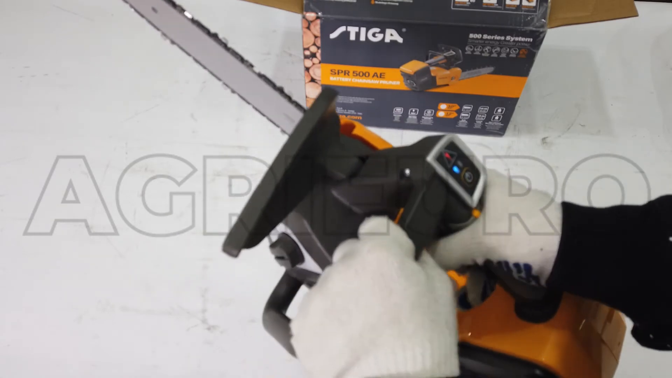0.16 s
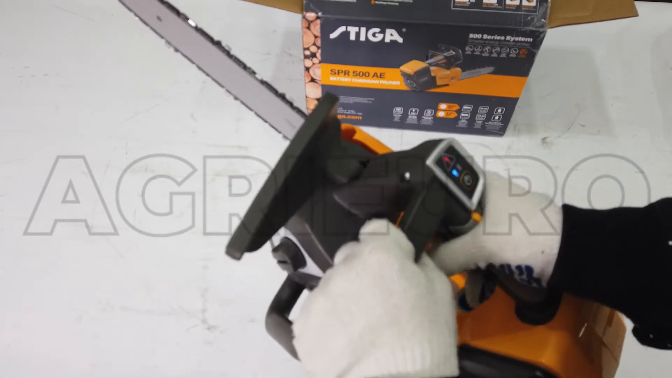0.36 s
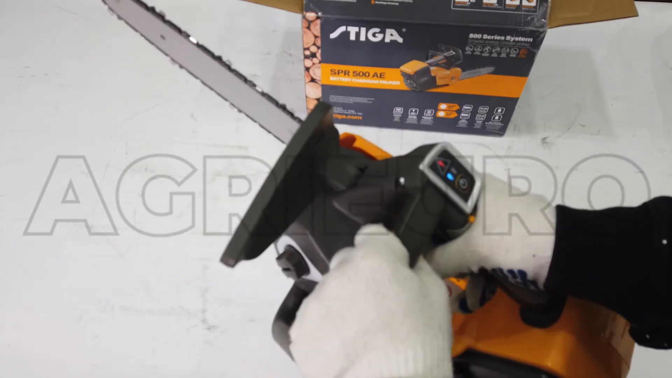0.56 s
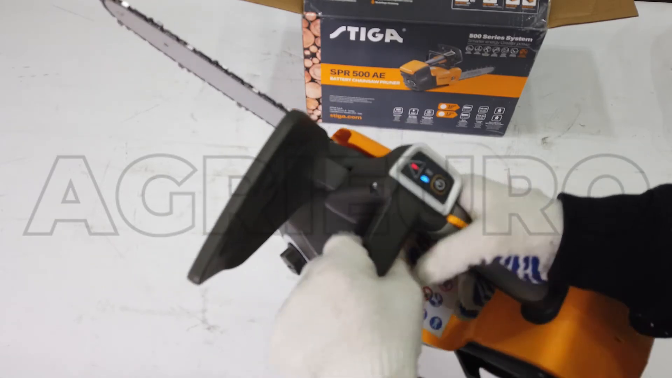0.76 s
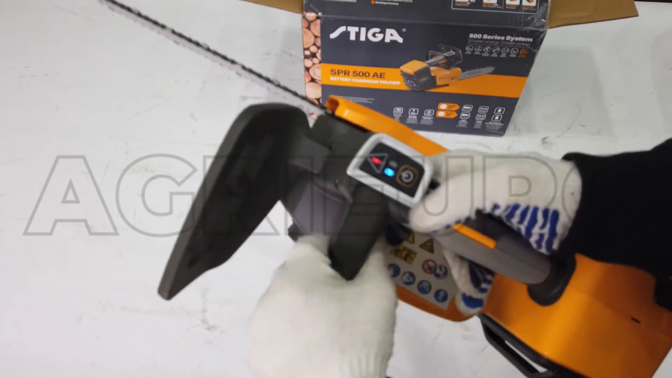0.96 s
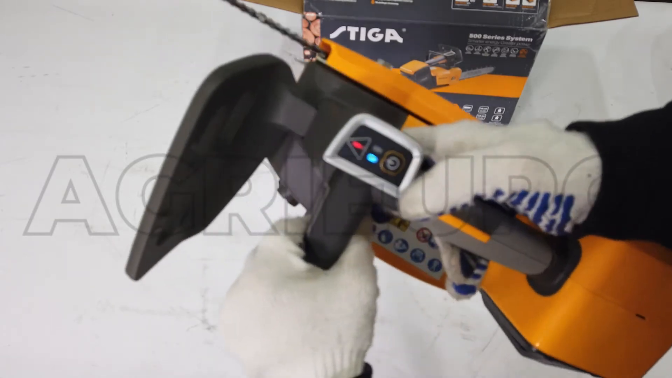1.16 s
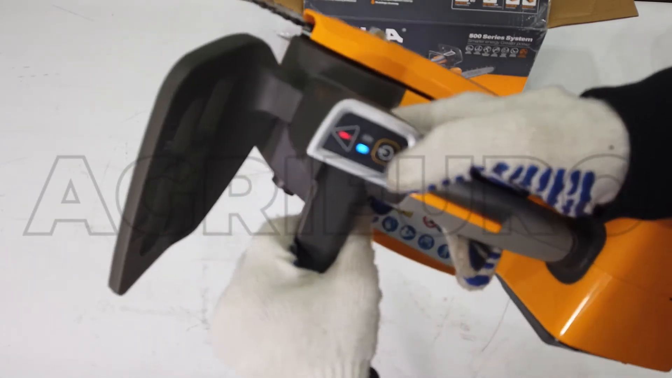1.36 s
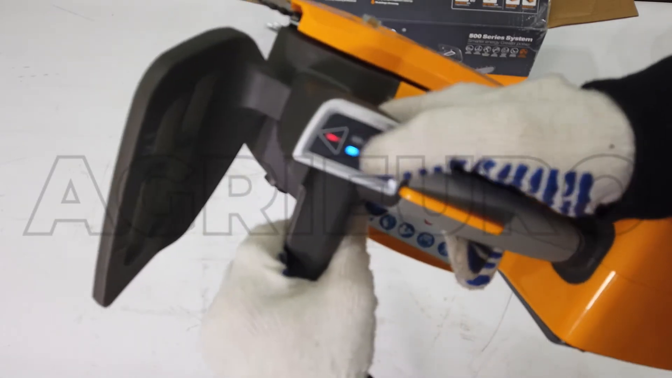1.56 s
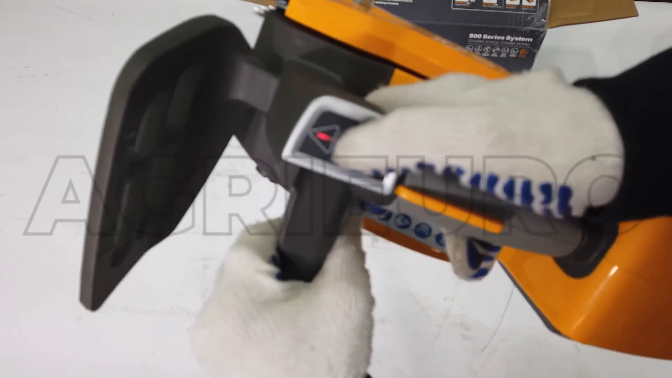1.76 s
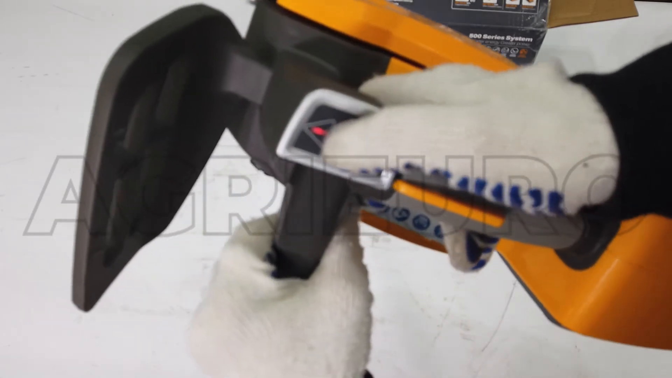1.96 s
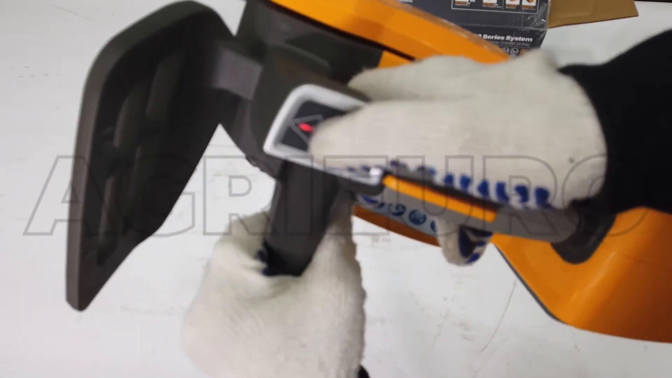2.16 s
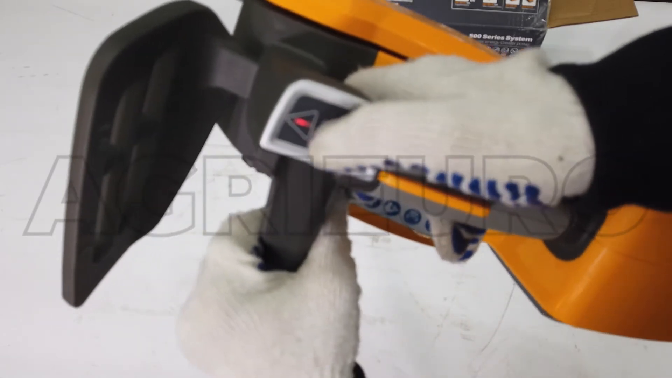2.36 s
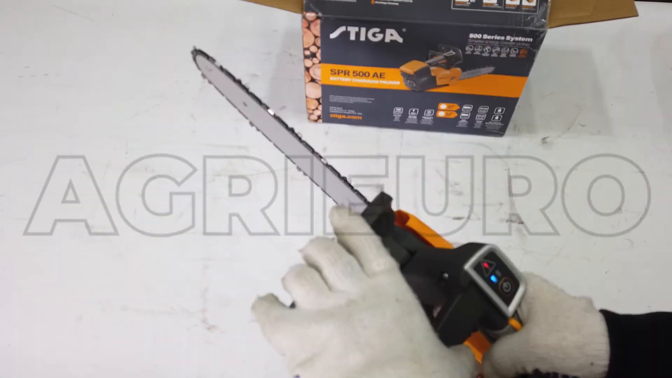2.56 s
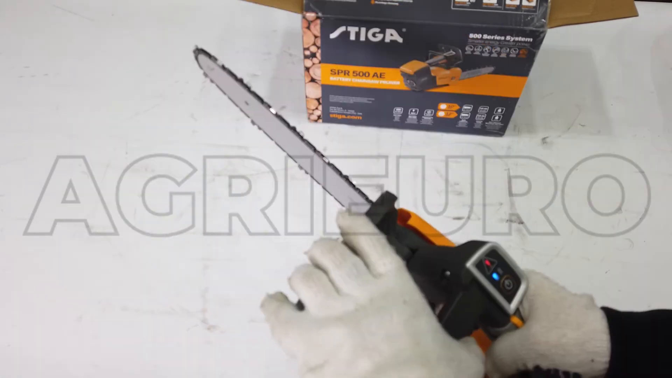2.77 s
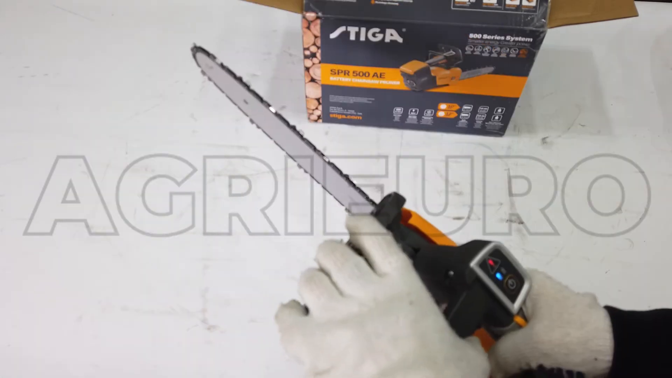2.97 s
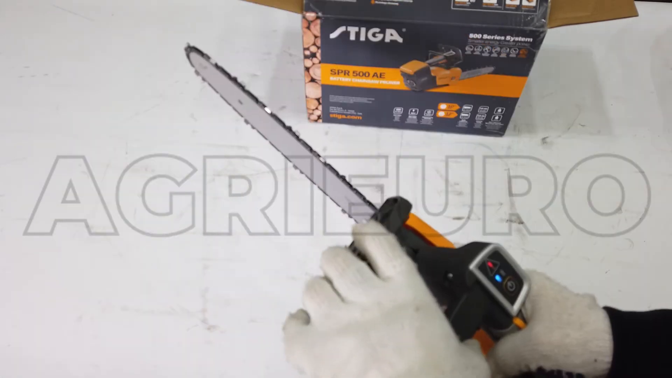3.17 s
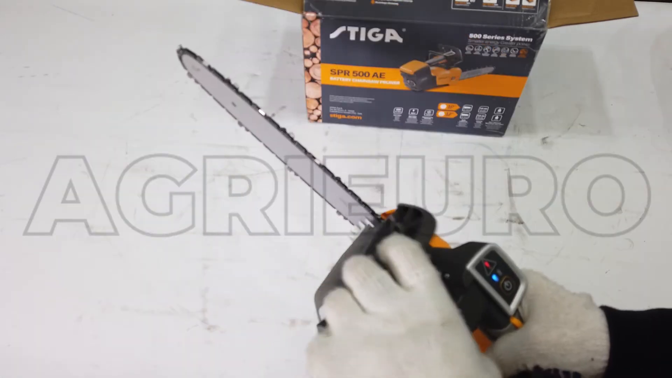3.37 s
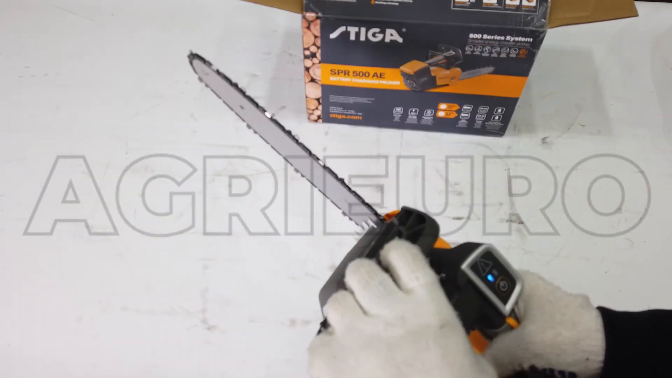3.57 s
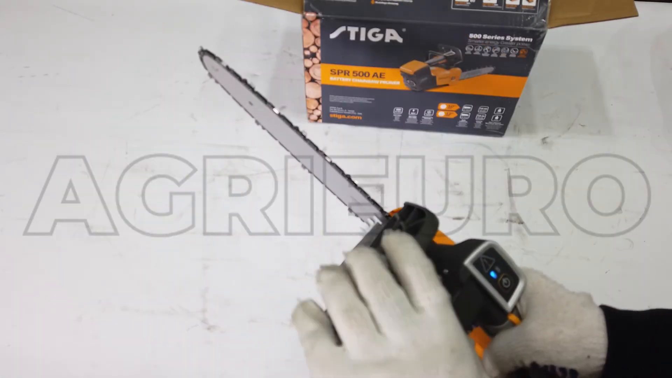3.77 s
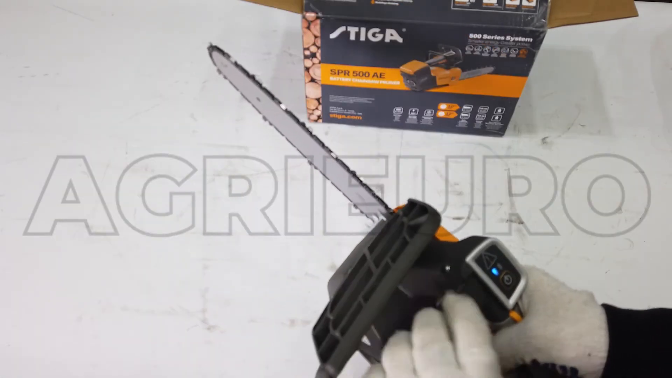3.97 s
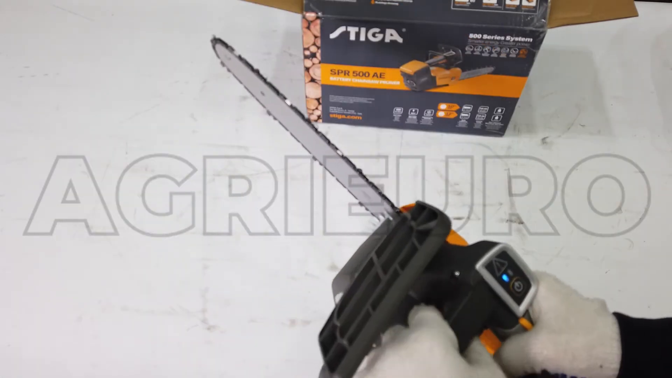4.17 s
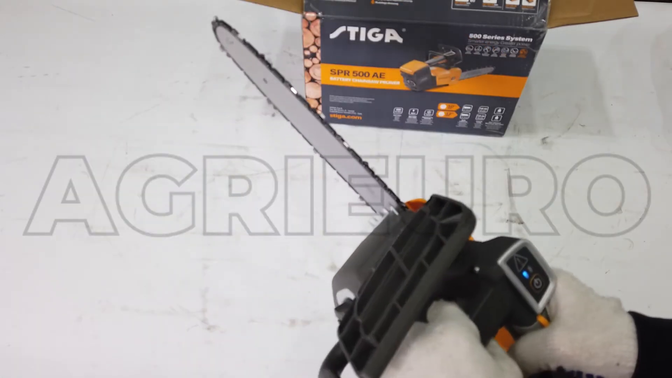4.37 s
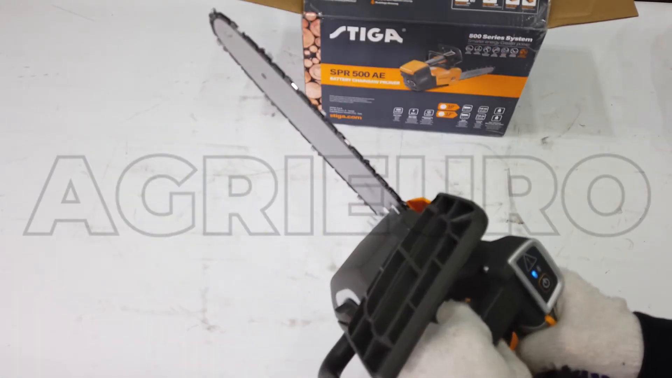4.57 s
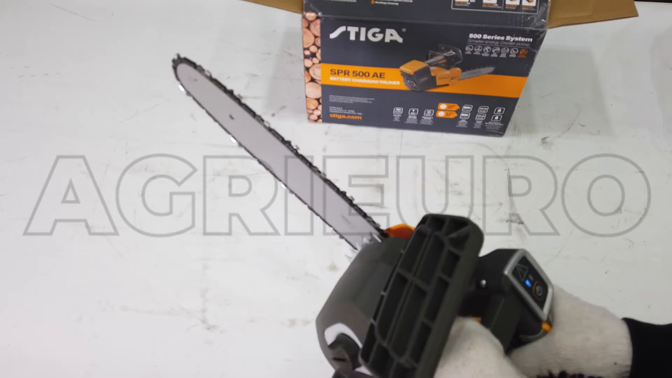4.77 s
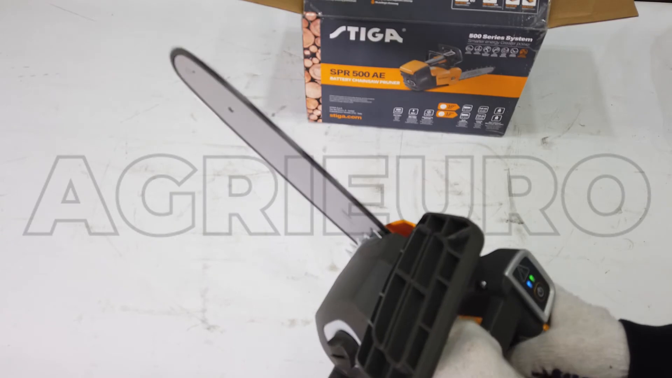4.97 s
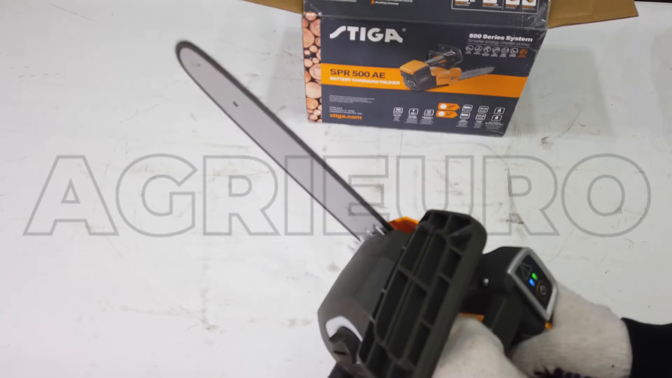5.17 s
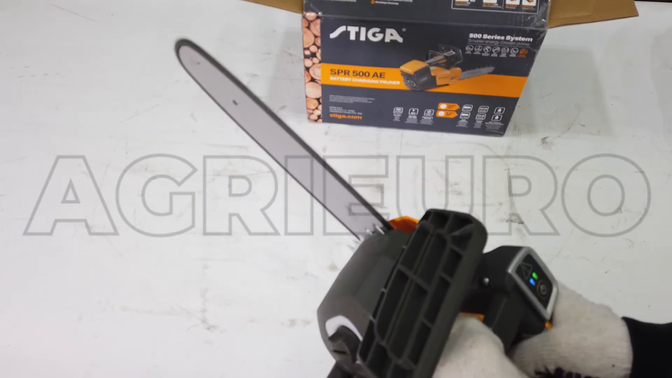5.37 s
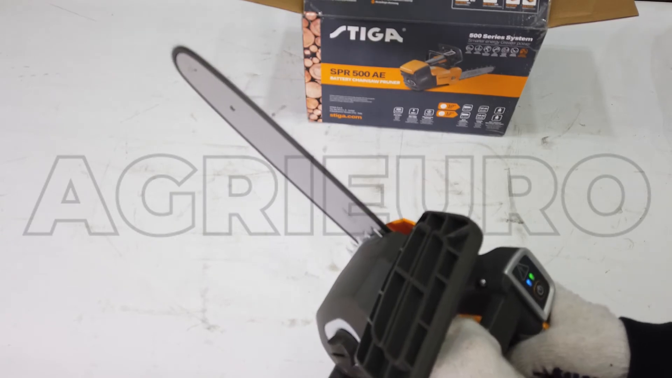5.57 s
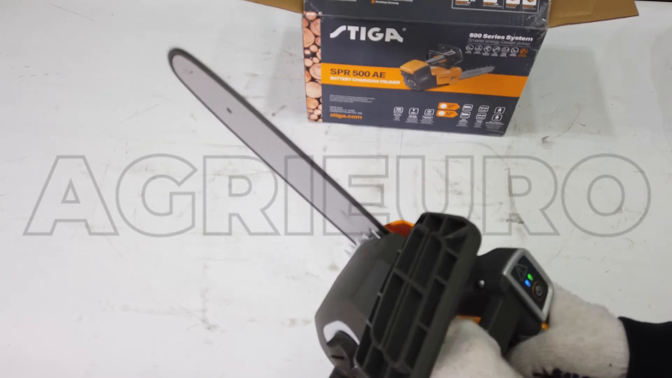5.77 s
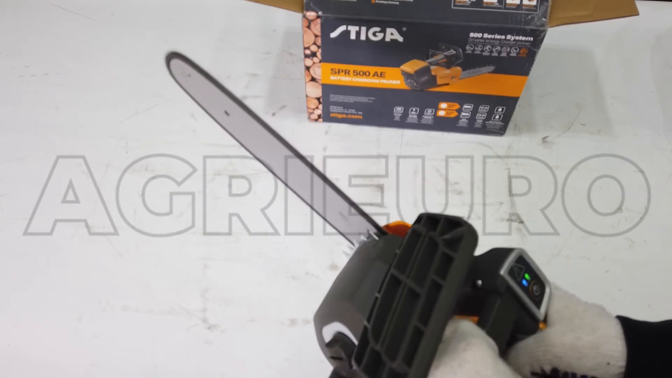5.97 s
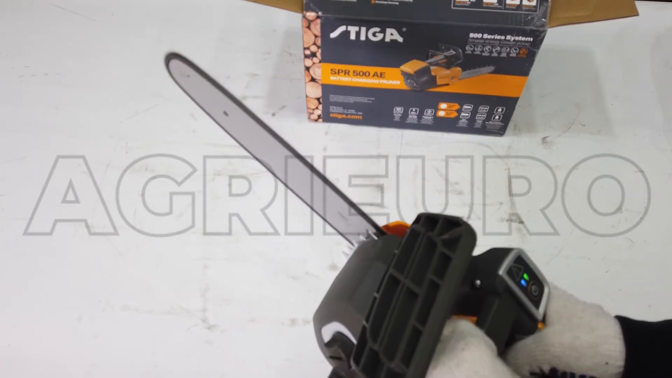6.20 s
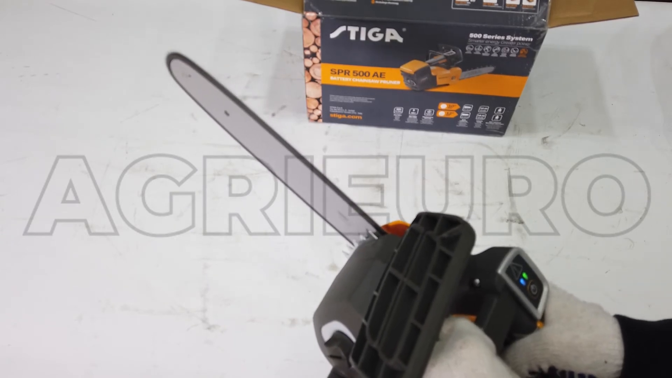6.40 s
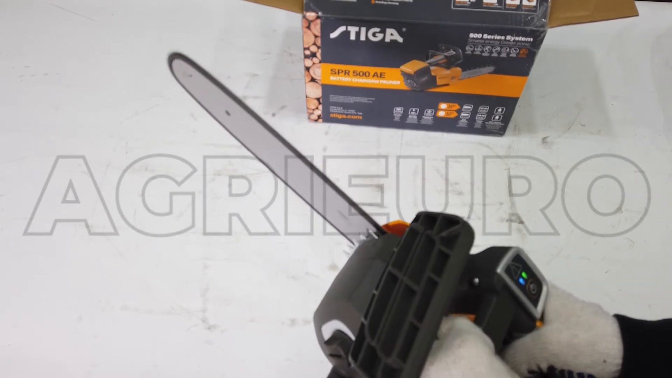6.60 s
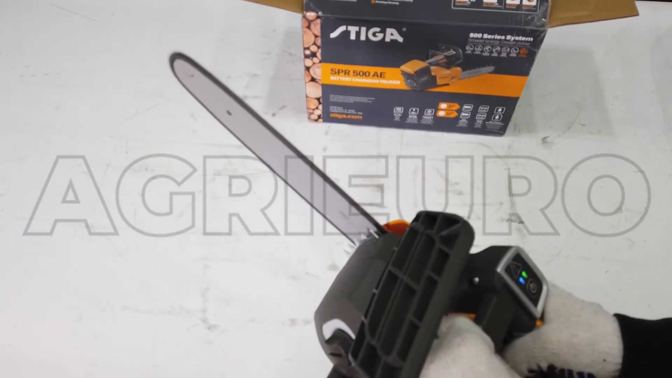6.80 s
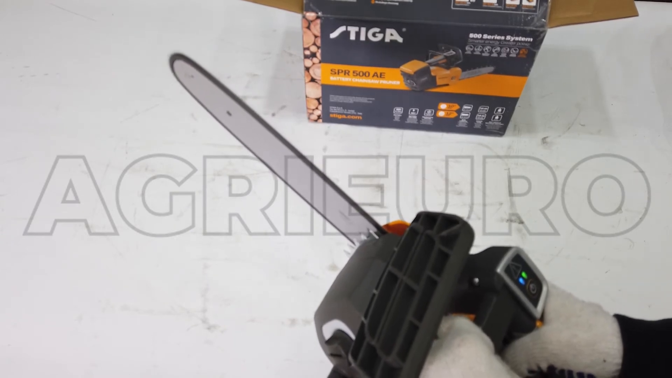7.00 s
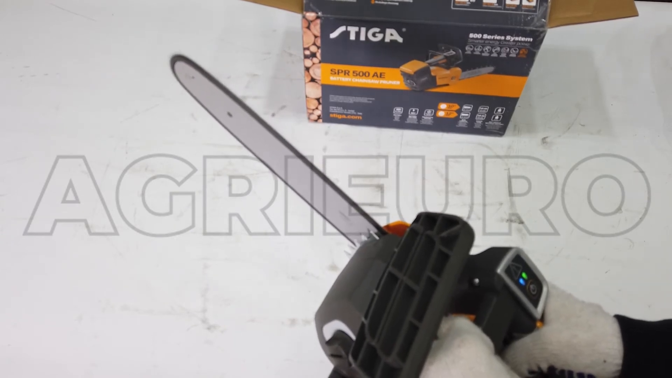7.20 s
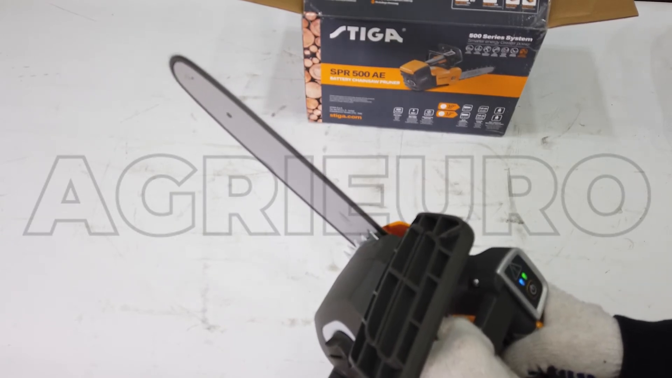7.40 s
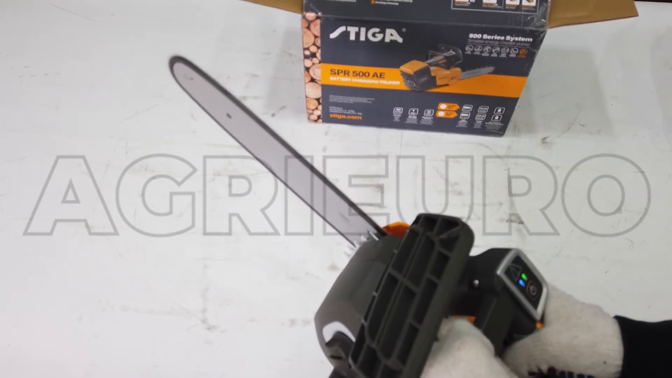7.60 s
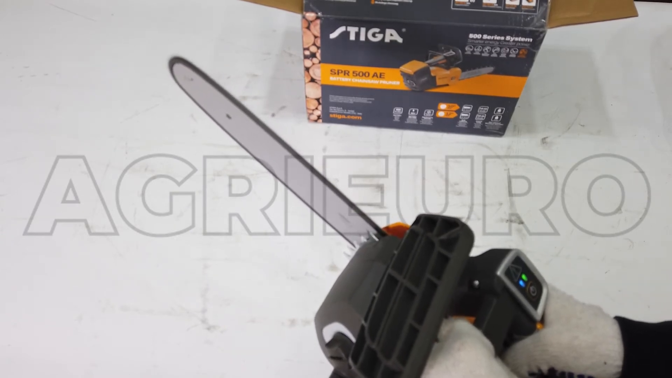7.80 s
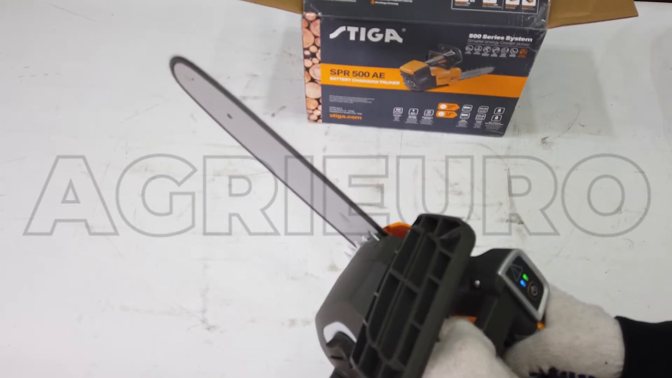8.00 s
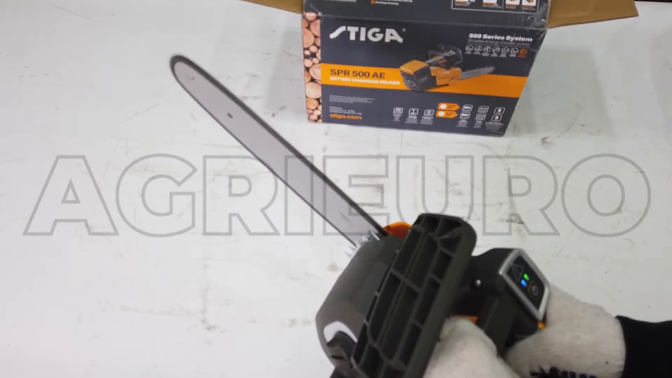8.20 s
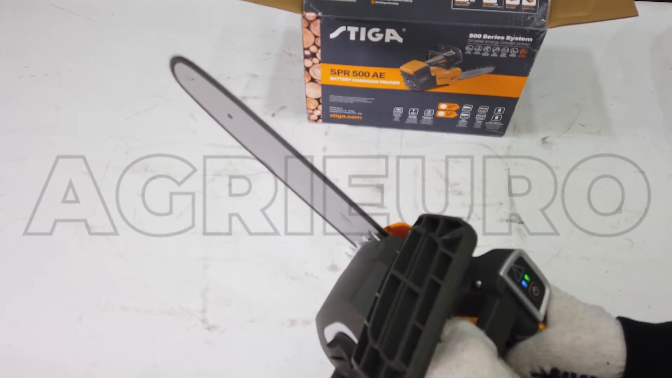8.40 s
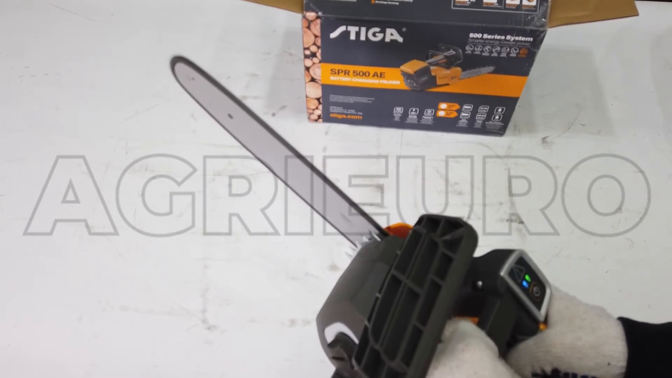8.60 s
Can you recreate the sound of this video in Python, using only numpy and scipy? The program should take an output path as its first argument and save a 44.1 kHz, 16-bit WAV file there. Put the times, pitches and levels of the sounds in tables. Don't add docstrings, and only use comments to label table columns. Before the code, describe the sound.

A small hard room with quiet air and a faint low compressor hum, heard closely in stereo with a short reverberation. From 0.15 to 0.85 s, gloves make a handful of dry, gritty little ticks on a plastic handle. After a pause, dull button and housing bumps cluster around 2.05 to 2.6 s, with a whisper of fabric rub at 2.5. At 3.55 s the chain brake releases with a sharp, springy plastic-metal clack, followed by faint knocks until 3.9. Near-silence returns, with a tiny tick at 4.9. At about 5.05 s the motor starts; the slack chain thumps at 5.12 and hardest at 5.17. The whine climbs quickly to full speed by 5.6 s. It then holds steady and far louder: a high motor hum near 930 Hz, rough chain rattle, metallic bar ringing and broad bright fan hiss, swelling subtly until it cuts off around 8.6 s, without winding down.

```python
import sys
import numpy as np
from scipy import signal
from scipy.fft import rfft, irfft
from scipy.io import wavfile
from scipy.ndimage import uniform_filter1d

SR = 44100
rng = np.random.default_rng(int(sys.argv[2]) if len(sys.argv) > 2 else 0)


def digitize_waveform(pressure):
    field = np.atleast_2d(pressure).T
    bounded = np.clip(field, -1, 1)
    quanta = np.round(bounded * 32767).astype(np.int16)
    wavfile.write(sys.argv[1], SR, quanta)


def boost(x):
    u = np.asarray(x, float) / 20
    return 10 ** u


N = 381465
TIME = np.arange(N) / SR
HZ = np.arange(N // 2 + 1) * SR / N + 1e-3


def level(x, db):
    return x * boost(db) / np.sqrt(np.mean(x ** 2))


def cut(x, hz, kind, order):
    return signal.sosfilt(signal.butter(order, hz, kind, fs=SR, output="sos"), x)


def along(table):
    hz, value = np.transpose(table)
    return np.interp(np.log(HZ), np.log(hz), value)


def walk(rate):
    hold = int(SR / rate)
    steps = np.repeat(rng.standard_normal(N // hold + 1), hold)
    return 1.46 * uniform_filter1d(uniform_filter1d(steps, hold), hold)[:N]


def airy(table, per_octave, slow_db, quick_db):
    noise = rfft(rng.standard_normal(N)) * boost(along(table))
    band = np.round(np.log2(HZ / 25) * per_octave).clip(0)
    out = np.zeros(N)
    for b in np.unique(band):
        out += irfft(noise * (band == b), N) * boost(slow_db * walk(2.61) + quick_db * walk(15))
    return level(out, 0)


def ring(x, modes):
    out = 0
    for k, (hz, width, db) in enumerate(modes):
        out = out + (-1) ** k * boost(db) * signal.lfilter(*signal.iirpeak(hz, hz / width, SR), x)
    return out


def strike(out, s, db, modes, length, grit, swell=1, passes=1):
    t = np.arange(int(.25 * SR)) / SR / length * 8 / swell
    push = grit * rng.standard_normal(len(t)) * (t * np.exp(1 - t)) ** swell / np.e
    push[int(length * SR * swell / 8)] += 1
    sound = ring(push, modes)
    if passes == 2:
        sound = ring(sound, modes)
    start = int((s - (swell - 1) * length / 16) * SR)
    np.add.at(out, start + np.arange(len(t)), sound * boost(db) / np.abs(sound).max())


def spread_out(x):
    return np.array([x, np.roll(x, N // 3), np.roll(x, -N // 3)])


def echoes(x):
    t60_s = 0.18
    t = TIME[:SR]
    tail = rng.standard_normal((2, SR)) * np.exp(-np.log(1000) * t / t60_s) * (t > .004)
    tail = tail / np.sqrt(np.sum(tail ** 2, axis=1, keepdims=True))
    return np.vstack([x, signal.fftconvolve(x[None], tail, axes=1)[:, :N]])


def ports(x, lead, room_db):
    # pitch_hz [Hz], level_db [dB]
    room_colour = [(40, -18), (250, -30), (700, -29), (1400, 0.5), (1850, -11.5), (2800, 2.5), (3700, -11),
                   (4600, -4.5), (6500, -1), (7300, 0), (8300, 3), (9600, 1.5), (10800, 20), (11600, 11),
                   (12500, 11), (14000, 1), (15500, -20)]
    wet = boost(along(room_colour) + room_db)
    shift = np.exp(.5j * along(lead) * np.array([[1], [-1]]))
    return irfft((rfft(x[0]) * shift + wet * rfft(x[1:])) / np.sqrt(1 + wet ** 2), N)


def room_air(compressor_turns):
    # pitch_hz [Hz], level_db [dB per Hz]
    air_colour = [(15, -52), (25, -16), (97, -16), (137, -15), (190, -12), (285, -22), (335, -20.5),
                  (545, -12), (659, -11.5), (911, -20), (1230, -21.5), (3430, -24.5), (7710, -39.5),
                  (10100, -21.5), (16000, -45)]
    air = irfft(rfft(airy(air_colour, 1.3, 0.21, 0.6)) * (HZ < 12100), N)
    throb = 0.49 * np.sin(2 * np.pi * compressor_turns)
    air = air + throb * cut(air, 5000, "high", order=2)
    return boost(-67.5) * spread_out(air)


def compressor_hum(turns):
    # multiple [of the turning rate], level_db [dB]
    harmonics = [(1, -7), (2, -5.5), (3, -23), (4, -7), (5, -13), (6, -9.5), (7, -23), (8, -19), (9, -9.5),
                 (10, -12.5), (11, -2.5), (12, 1.5), (13, -9.5), (14, -29.5), (15, -22), (16, -18.5),
                 (17, -16), (18, -29.5), (19, -15), (20, -14.5), (21, -19.5), (22, -34), (23, -8),
                 (24, -43), (25, -9.5)]
    hum_db, smear_turns = -67, 0.21
    hum = np.zeros(N)
    for k, db in harmonics:
        loudness = boost(hum_db + db + 0.31 * walk(3.0))
        hum += loudness * np.sin(2 * np.pi * (k * turns + smear_turns * k ** 2))
    return np.sqrt(2) * hum


def mains_lines():
    # pitch_hz [Hz], level_db [dB]
    lines = [(100, -78), (200, -91.5), (1663, -85.5), (2078, -90), (2632, -91), (3973, -89.5), (10061, -80),
             (10379, -92)]
    return np.sqrt(2) * sum(boost(db) * np.sin(2 * np.pi * (hz * TIME + rng.random())) for hz, db in lines)


def glove_ticks():
    # start_s [s], peak_db [dB], second_ring_hz [Hz], low_knock_db [dB re peak]
    tick_events = [(0.162, -47.5, 4880, -7), (0.18, -46.5, 5000, 1), (0.318, -43.5, 3430, -1),
                   (0.508, -48.5, 4020, -12), (0.527, -53, 3970, 4), (0.6154, -50.5, 1670, -13),
                   (0.6309, -42.5, 3850, -7), (0.822, -53, 4070, -17), (3.509, -53, 3300, -9),
                   (4.926, -57, 3790, -2.5)]
    ticks = np.zeros(N)
    for s, db, hz, low_db in tick_events:
        handle = [(2650, 260, 1.5), (hz, 600, -3), (650, 250, low_db), (1650, 300, -8)]
        strike(ticks, s, db, handle, length=0.0102, grit=4, swell=3)
    return cut(ticks, 4000, "low", order=2)


def button_bumps():
    # start_s [s], peak_db [dB], ring_hz [Hz], length_s [s]
    bump_events = [(2.046, -52, 800, .05), (2.363, -42.5, 335, 0.016), (2.372, -48, 302, 0.035),
                   (2.387, -47, 424, 0.052), (2.417, -53, 350, 0.086), (2.498, -44, 590, 0.031),
                   (2.508, -46, 700, 0.062), (2.526, -50, 450, 0.14), (2.59, -58, 700, .05),
                   (3.567, -49, 493, .05), (3.671, -51, 215, 0.034), (3.685, -52.5, 1300, 0.091),
                   (3.876, -57, 170, 0.056)]
    bumps = np.zeros(N)
    for s, db, hz, length in bump_events:
        strike(bumps, s, db, [(hz, hz / 2, 0), (2.09 * hz, hz / 2, -6)], length, grit=3.0)
    return cut(bumps, 1100, "low", order=2)


def glove_rub():
    start_s, end_s = 2.5, 2.62
    swell = np.sin(np.pi * np.clip((TIME - start_s) / (end_s - start_s), 0, 1)) ** .5
    rub = cut(rng.standard_normal(N), 13000, "high", order=6)
    return swell * boost(4.8 * walk(59)) * level(rub, -71)


def brake_snap():
    # pitch_hz [Hz], width_hz [Hz], level_db [dB]
    snap_rings = [(450, 230, 2.5), (623, 84, 13), (1550, 230, -5), (2680, 240, -2), (3880, 260, -14),
                  (5070, 510, -25), (8300, 690, -11)]
    snap = np.zeros(N)
    strike(snap, 3.548, -32.5, snap_rings, length=0.016, grit=0.55, swell=1.3)
    return cut(snap, 4000, "low", order=2)


def chain_catch():
    # start_s [s], peak_db [dB], ring_hz [Hz], length_s [s]
    jerk_events = [
        (5.117, -34, 370, 0.021),
        (5.174, -28, 580, 0.044),
        (5.218, -43, 374, 0.032),
    ]
    jerks = np.zeros(N)
    for s, db, hz, length in jerk_events:
        strike(jerks, s, db, [(hz, 62, 0), (1650, 120, -13)], length, grit=0.12, passes=2)
    return jerks


def shaft_speed():
    # time_s [s], speed_hz [Hz]
    run_up = [
        (5.04, 12),
        (5.12, 30),
        (5.28, 74),
        (5.46, 128),
        (5.56, 150),
        (5.63, 154.8),
        (5.8, 155.5),
        (7.0, 155.9),
        (8.65, 155.55),
    ]
    return uniform_filter1d(np.interp(TIME, *np.transpose(run_up)), SR // 25)


def bar_tilt():
    # time_s [s], level_db [dB]
    tilt_points = [(5.6, -1.4), (6.0, 0.23), (6.5, -0.4), (6.9, -0.9), (7.4, -1.6), (7.9, 0.6), (8.3, -0.2),
                   (8.65, 0.3)]
    return np.interp(TIME, *np.transpose(tilt_points))


def chain_blows(turns):
    link = (6 * turns).astype(int)
    size = boost(2.47 * rng.standard_normal(link[-1] + 1))[link]
    return size * (0.36 + np.exp(-(6 * turns % 1) / 0.4))


def fan_hiss(blows, tilt_db):
    # pitch_hz [Hz], level_db [dB per Hz]
    hiss_colour = [(700, -9), (1100, -24), (1900, -1), (2500, -6), (3400, -4), (5300, -2.5), (7500, -1.5),
                   (9500, 0), (12000, 3.5), (14000, -1), (15700, -6)]
    # pitch_hz [Hz], width_hz [Hz], level_db [dB]
    thin_rings = [(2790, 190, -3.5), (3224, 110, -7.5), (3847, 160, 0), (4610, 190, 1.5), (6220, 570, 1.5),
                  (8030, 410, -1), (10370, 110, 4), (11000, 180, -4), (13400, 440, -3)]
    rings = np.zeros((3, N))
    for mode in thin_rings:
        beam_db = 1.9 * tilt_db * np.sign(8500 - mode[0])
        rings += boost(0.8 * walk(1.32) + beam_db) * ring(rng.standard_normal((3, N)), [mode])
    hiss = spread_out(airy(hiss_colour, 3, 0.33, 0.83)) + level(rings, -5)
    return cut(hiss, 660, "high", order=2) * blows ** 0.2


def bar_rattle(blows):
    # pitch_hz [Hz], width_hz [Hz], level_db [dB]
    bar_modes = [(1300, 110, -1), (1642, 79, 9), (2060, 167, 3), (2460, 170, -1), (3000, 640, -7)]
    return cut(ring(blows * rng.standard_normal((3, N)), bar_modes), 890, "high", order=2)


def housing_rattle(blows, slow):
    # pitch_hz [Hz], width_hz [Hz], level_db [dB]
    housing_modes = [(181, 37, -18.5), (350, 80, -13.5), (464, 68, -6), (562, 96, -4), (631, 45, -1.5),
                     (800, 44, -4), (1050, 240, -12.5)]
    scrape = blows * rng.standard_normal((3, N))
    panel = ring(scrape, [(368, 24.6, 0.93)])
    return cut(ring(scrape, housing_modes) + slow * panel, 233, "high", order=3)


def shaft_tones(turns, slow):
    # multiple [of shaft speed],
    # level_db [dB re the sprocket tone], added_db [dB added at half speed]
    multiples = [1, 2, 2.933, 3, 4, 4.067, 5, 6, 7, 8, 9, 12, 13, 14, 18, 19, 29, 31]
    tone_levels = [-0.5, -20, -16.5, -15, -7.5, -8.5, 0.1, 0.3, -6, -47, -26, -16, -8, -4, -17, -28, -30,
                   -23]
    half_speed_levels = [-15, -25, -30, -30, -12, -20, -9, 0, 1.5, -5, -10, -2, -35, -30, -25, -25, -25,
                         -25]
    tones = np.zeros(N)
    for k, slow_db, db in zip(multiples, half_speed_levels, tone_levels):
        waver_db = (0.67 - 0.0817 * db) * walk(14)
        loudness = np.sqrt(2) * boost(db + slow * slow_db + waver_db)
        tones += loudness * np.sin(2 * np.pi * (k * turns + 0.04 * k ** 2))
    return tones


def saw():
    # pitch_hz [Hz], width_hz [Hz], level_db [dB]
    shell_modes = [(570, 80, 4.5), (825, 32, 1.5)]
    hz = shaft_speed()
    effort = np.gradient(hz).clip(0) / np.gradient(hz).max()
    tilt_db = bar_tilt()
    turns = np.cumsum(hz * (1 + .0009 * walk(20))) / SR
    slow = 2 * (1 - hz / hz.max())

    def answer(full_db, knee_hz, steep, effort_db, tilt_share):
        weak_db = 10 * np.log10(1 + (knee_hz / hz) ** (2 * steep))
        return full_db - weak_db + effort_db * effort + tilt_share * tilt_db

    tone_db = answer(-42, knee_hz=58, steep=12, effort_db=2.5, tilt_share=0.2)
    housing_db = answer(-42.5, knee_hz=41, steep=2.5, effort_db=2.2, tilt_share=0.34)
    bar_db = answer(-43, knee_hz=67, steep=1.84, effort_db=3, tilt_share=0.3)
    hiss_db = answer(-31, knee_hz=150.5, steep=1.63, effort_db=-0.4, tilt_share=0.27)
    for centre, width, db in shell_modes:
        tone_db = tone_db + db / (1 + ((6 * hz - centre) / width) ** 2) * effort

    blows = chain_blows(turns)
    rattle = level(housing_rattle(blows, slow), 1.4) * boost(housing_db)
    rattle += level(bar_rattle(blows), 0) * boost(bar_db)
    rattle += level(fan_hiss(blows, tilt_db), 0.18) * boost(hiss_db)
    start_s, fade_s = 5.04, 0.037
    running = np.clip((TIME - start_s) / fade_s, 0, 1)
    tones = running * shaft_tones(turns, slow) * boost(tone_db)
    return cut(tones, 293, "high", order=4), running * rattle


def scene():
    # pitch_hz [Hz], lead [radians]
    far_lead = [(250, 0), (550, .5), (900, 1.5), (1150, 3.5), (1900, 5), (3300, 7), (8100, 9),
                (10100, -0.5)]
    near_lead = [(400, .08), (620, .55), (950, 1.5), (1350, 1.4), (1550, .3), (1850, 3.1), (2030, 4.6),
                 (2170, 5.65), (3200, 6.28), (5800, 6.2), (6400, 7.2), (7000, 6.28)]
    motor_lead = [(400, .08), (620, .55), (950, 1.6), (1870, 1.7), (2030, 4.4), (2180, 5.6), (3200, 6.28)]
    compressor_turns = 46.17 * TIME
    air = room_air(compressor_turns)
    hum = compressor_hum(compressor_turns) + mains_lines()
    hands = glove_ticks() + button_bumps() + glove_rub() + brake_snap() + chain_catch()
    tones, rattle = saw()
    rattle[0] += boost(-10.5) * echoes(rattle[0])[1]
    fade = np.clip((N / SR - TIME) / .002, 0, 1)
    far = ports(echoes(hum), far_lead, -22) + ports(air, far_lead, 8)
    near = ports(echoes(hands), near_lead, -10) + ports(rattle * fade, near_lead, 0.33)
    return far + near + ports(echoes(tones * fade), motor_lead, -22)


def top_cut(x):
    return signal.sosfilt(signal.butter(12, 16740, fs=SR, output="sos"), x)


def record(dry):
    top_hz = 15730
    keep_below = np.clip((top_hz - HZ) / 80 + .5, 0, 1)
    left, right = rfft(dry * signal.windows.tukey(N, .002)) * keep_below
    mid = irfft(left + right, N) / 2
    band = np.round((HZ - 3200) / 620).clip(-1)
    loud = uniform_filter1d(dry[0] ** 2, SR // 20) > boost(-45) ** 2
    side = np.zeros(N)
    for b in np.unique(band):
        dropped = loud & (walk(22) > .45) & (b >= 0)
        width = uniform_filter1d(1.15 - 1.15 * dropped, SR // 50)
        side += irfft((left - right) / 2 * (band == b), N) * width
    return top_cut(np.array([mid + side, mid - side]))


dry = scene()
out = record(dry)
digitize_waveform(out)
```